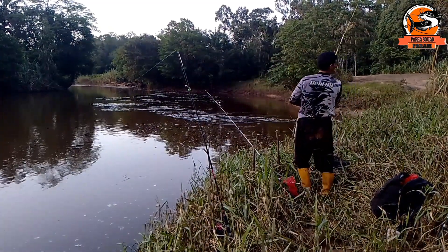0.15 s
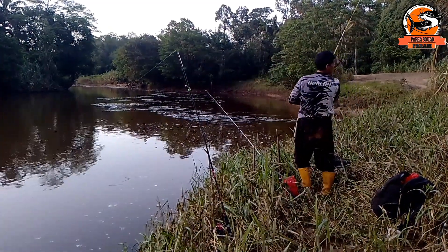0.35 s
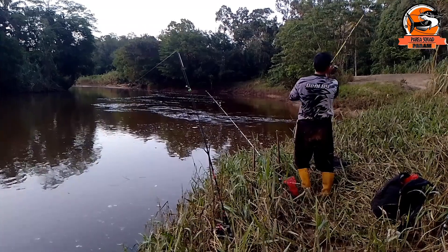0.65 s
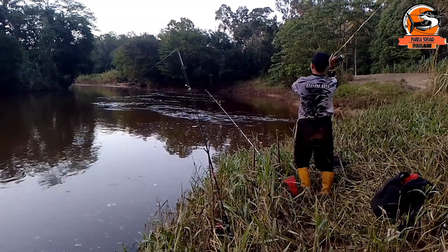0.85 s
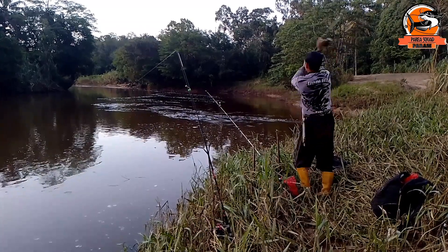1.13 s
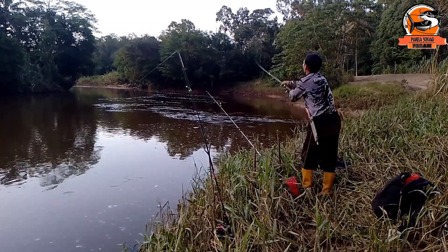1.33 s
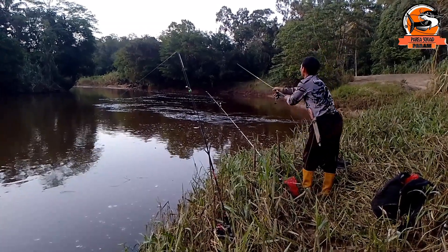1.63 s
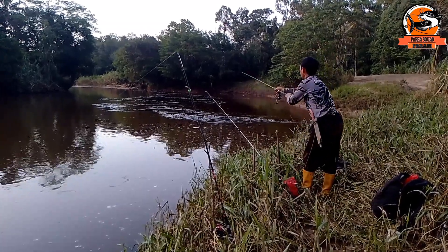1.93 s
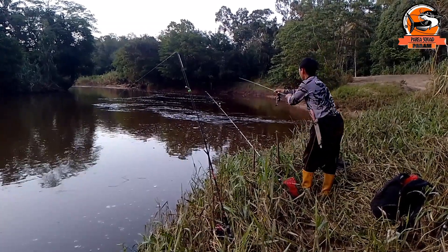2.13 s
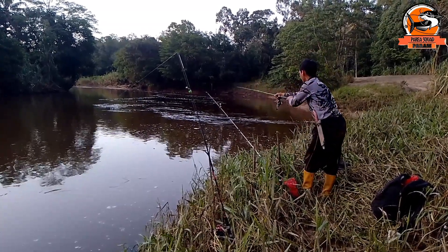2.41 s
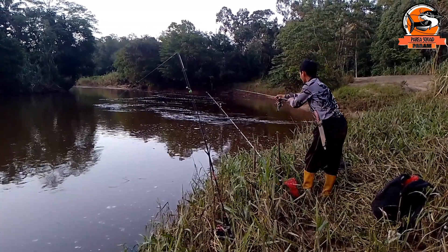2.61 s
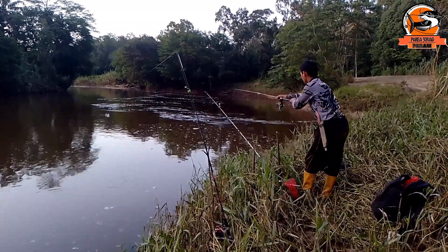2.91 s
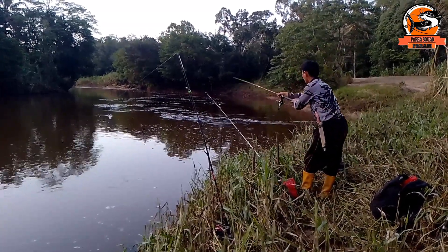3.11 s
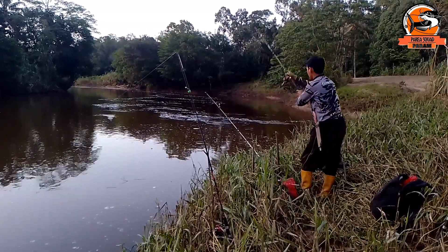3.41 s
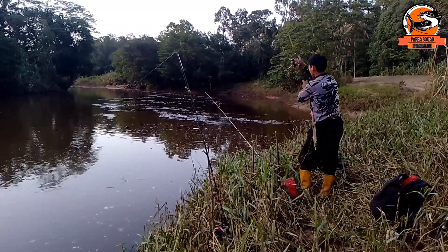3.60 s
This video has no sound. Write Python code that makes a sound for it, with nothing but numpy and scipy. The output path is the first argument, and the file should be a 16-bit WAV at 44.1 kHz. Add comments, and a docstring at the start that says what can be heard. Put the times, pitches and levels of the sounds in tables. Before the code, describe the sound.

Shrill insects chirr and rattle in rapid rasps over a hissing chorus beside a murmuring river

```python
"""First comes the hiss of a far insect chorus over a murmuring river, on a wooded bank in the evening.
With it go a trilling cricket, thin gliding whines and a lower throbbing drone, all made of wavering tones.
Close by, a shrill caller (a cicada or a small scolding bird) stutters in rasps and squeaks and holds one
long rattle: fast chirping pulses with puffs of noise, broken by clear tones that curve in pitch.
An angler's cast adds a swish of shaped noise and a few soft knocks; a stalk snaps and a boot thuds."""
import sys
import numpy as np
from scipy import signal
from scipy.fft import rfft, irfft
from scipy.io import wavfile
from scipy.ndimage import uniform_filter1d

SR = 44100
rng = np.random.default_rng(int(sys.argv[2]) if len(sys.argv) > 2 else 0)


def master(y):
    """Save y as 16-bit WAV."""
    cut = np.clip(np.atleast_2d(y).T, -1, 1)
    pcm = np.round(cut * 32767)  # scale
    wavfile.write(sys.argv[1], SR, pcm.astype(np.int16))


N = 165375
TIME = np.arange(N) / SR   # seconds


def from_db(db):
    """Turn decibels into a gain."""
    return 10 ** (np.asarray(db) / 20)


def rms_one(x):
    """Scale a sound to an average strength (rms) of 1."""
    return x / np.sqrt(np.mean(x ** 2) + 1e-20)


def level(rows):
    """Gain over time, drawn through (time [s], level [dB]) points."""
    return from_db(np.interp(TIME, *np.transpose(rows)))


def coloured(points, drive=1):
    """Noise, made louder and softer by drive, then given a spectrum with steep skirts; rms 1."""
    hz, db = np.transpose(points)
    f = np.maximum(np.arange(N // 2 + 1) * SR / N, 1)
    skirts = np.minimum(f / hz[0], 1) ** 6 * np.minimum(hz[-1] / f, 1) ** 6
    shape = from_db(np.interp(np.log(f), np.log(hz), db))
    noise = rng.standard_normal(N) * drive
    return rms_one(irfft(rfft(noise) * skirts * shape, N))


def drift(rate):
    """Smooth random wandering, up to about rate wiggles per second; rms 1."""
    f = np.arange(N // 2 + 1) * SR / N
    return rms_one(irfft(rfft(rng.standard_normal(N)) / (1 + (f / rate) ** 4), N))


def gate(start, length, attack, release):
    """Straight attack, hold and release; the two ramps are centred on the ends."""
    rise = (TIME - start) / attack
    fall = (start + length - TIME) / release
    return np.clip(np.minimum(rise, fall) + .5, 0, 1)


def phase_of(hz):
    """Running phase of a moving pitch."""
    return 2 * np.pi * np.cumsum(hz) / SR


# Spectrum of the river: (frequency [Hz], relative level [dB per Hz])
RIVER_COLOUR = [(15,-62),(25,-24),(70,-7.5),(120,-10),(164,-21.5),(276,-3),(490,-8.5),(1100,-6.5),(2080,-1.5),(3520,-120)]
RIVER_DB = -42.5


def river():
    """Running water heard as a steady, mostly low noise."""
    return from_db(RIVER_DB) * coloured(RIVER_COLOUR)


# Spectrum of the far insects together: (frequency [Hz], relative level [dB per Hz])
CHORUS_COLOUR = [(1300,-36.5),(1650,-6),(2000,-12),(2500,-11),(2900,-10),(3500,2),(4350,4),(5200,-5),(6100,-10),(6800,-11.5),(7600,-20.5),(9400,-22),(10200,-26),(15000,-49)]
# Slow swells of the far insects, before echoes: (time [s], level [dB])
CHORUS_LEVEL = [(0,-28.5),(.5,-27),(1.05,-28.5),(1.6,-27.5),(2.3,-25.5),(2.9,-28),(3.3,-26.5),(3.49,-30),(3.75,-28)]
CHORUS_FLUTTER_DB = 1.85


def chorus():
    """Many far insects blur into a fluttering hiss."""
    flutter = from_db(CHORUS_FLUTTER_DB * drift(32))
    return level(CHORUS_LEVEL) * coloured(CHORUS_COLOUR, flutter)


FAR_DRONE_HZ, FAR_DRONE_WIDTH_HZ, FAR_DRONE_DB = 2127, 126, -41
DRONE_WOBBLE_HZ = 16   # rms, for far and nearer drones


def far_drone():
    """Farther callers blend into a narrow band: a tone whose strength wanders at random."""
    pitch = FAR_DRONE_HZ + DRONE_WOBBLE_HZ * drift(42.4)
    return from_db(FAR_DRONE_DB) * rms_one(drift(FAR_DRONE_WIDTH_HZ / 2) * np.sin(phase_of(pitch)))


# Calls of the droning insects: (start [s], length [s], level [dB])
DRONES = [(-.1,0.62,-38),(1.176,0.091,-38.5),(1.495,.53,-34.5),(2.609,0.077,-35.5),(2.799,.62,-35.5)]
DRONE_HZ, DRONE_ARCH_HZ, DRONE_THROB_DB = 2165, 62, 2.4


def drones():
    """Throbbing insect tones that arch up and down in pitch."""
    wobble, out = DRONE_WOBBLE_HZ * drift(110), np.zeros(N)
    for start, length, db in DRONES:
        arch = np.sin(np.pi * np.clip((TIME - start) / length, 0, 1))
        tone = np.sin(phase_of(DRONE_HZ + DRONE_ARCH_HZ * arch + wobble))
        out += from_db(db) * gate(start, length, 0.015, 0.034) * tone
    return np.sqrt(2) * out * rms_one(from_db(DRONE_THROB_DB * drift(38)))


HIGH_WHINE_HZ, HIGH_WHINE_DB = 9060, -55.5
WHINE_WOBBLE_HZ = 26   # rms, for this and the gliding whines


def high_whine():
    """A very faint high tone whose strength wanders at random."""
    tone = np.sin(phase_of(HIGH_WHINE_HZ + WHINE_WOBBLE_HZ * drift(29.5)))
    return from_db(HIGH_WHINE_DB) * drift(50) * tone


# Thin whines: (start [s], length [s], level [dB], start pitch [Hz], end pitch [Hz])
WHINES = [(0,.13,-38,6180,5680),(.15,.19,-33,5660,5640),(.31,.05,-38,6380,6200),(.42,.24,-36,5990,6080),(.67,.05,-37,6050,5820),(.72,.4,-32.5,5680,5530),(1.03,.08,-38,6420,6150),(2.07,.24,-29.5,5280,5370),(3.02,.3,-35,5800,5700),(3.62,.2,-39.5,6010,5900)]
WHINE_PULSES_PER_S, WHINE_PULSE_DEPTH = 37, .45
WHINE_FADE_S, WHINE_FLUTTER_DB = .035, 1.8


def whines():
    """Thin insect tones that glide in pitch and pulse unevenly."""
    wobble, out = WHINE_WOBBLE_HZ * drift(120), np.zeros(N)
    for start, length, db, *hz in WHINES:
        pitch = np.interp(TIME, [start, start + length], hz) + wobble
        out += from_db(db) * gate(start, length, WHINE_FADE_S, WHINE_FADE_S) * np.sin(phase_of(pitch))
    pulse_rate = WHINE_PULSES_PER_S * np.exp(0.192 * drift(14.5))
    pulsing = 1 + WHINE_PULSE_DEPTH * np.sin(phase_of(pulse_rate))
    return np.sqrt(2) * out * rms_one(pulsing * from_db(WHINE_FLUTTER_DB * drift(45)))


# Trills of the cricket: (start [s], length [s], level [dB])
TRILLS = [(-.05,0.49,-40),(0.902,0.51,-40.5),(1.89,0.53,-42.5),(2.906,0.57,-44.5)]
CRICKET_HZ, CRICKET_PULSES_PER_S, CRICKET_FALL_HZ = 6415, 38, 266


def cricket():
    """A trill about once a second; every wing stroke is a swelling tone that sags in pitch."""
    stroke = TIME * CRICKET_PULSES_PER_S % 1   # 0 to 1 through each stroke
    pitch = CRICKET_HZ + CRICKET_FALL_HZ * (.5 - stroke) + 25 * drift(170)
    tone = rms_one(np.sin(np.pi * stroke) ** 2 * np.sin(phase_of(pitch)))
    return tone * sum(from_db(db) * gate(start, length, 0.037, 0.045) for start, length, db in TRILLS)


# Rise and fall of the cast's swish: (time [s], level [dB])
SWISH_LEVEL = [(1.3,-47),(1.41,-28),(1.52,-30),(1.65,-33),(1.85,-36.5),(2.3,-52)]
# Spectrum of the swish: (frequency [Hz], relative level [dB per Hz])
SWISH_COLOUR = [(200,-8),(550,0),(1100,-1.5),(2200,5.5),(5000,3.5),(9000,-11),(12000,-12.5),(15500,-13)]


def swish():
    """The angler's cast through the air: broad noise that rises fast and fades slowly."""
    return level(SWISH_LEVEL) * coloured(SWISH_COLOUR)


# Dull thuds of a shifting boot: (time [s], level before the attack ramp [dB], pitch [Hz])
THUDS = [(2.97,-32.5,620),(2.995,-35.5,310.5),(3.021,-31,252)]
THUD_ATTACK_S, THUD_DECAY_S = 0.0055, 0.025


def thuds():
    """Short low puffs of noise from trodden grass and soil."""
    out = np.zeros(N)
    for start, db, hz in THUDS:
        attack = np.clip((TIME - start) / THUD_ATTACK_S, 0, 1)
        decay = np.exp(-np.abs(TIME - start) / THUD_DECAY_S)
        puff = coloured([(hz * 0.87, -8), (hz, 0), (hz * 1.15, -9), (hz * 3.16, -15)])
        out += from_db(db) * attack * decay * puff
    return out


# Soft knocks of the tackle, before the bass is cut: (time [s], level [dB], pitch [Hz])
KNOCKS = [(1.295,-36,897),(1.31,-27.5,870),(1.409,-28,615.4),(1.486,-27.5,817),(1.512,-31,568),(1.601,-24,841),(1.618,-19.5,862)]
# Ways a knocked object rings: (pitch ratio, relative level [dB], time to fall 60 dB [s])
KNOCK_MODES = [(1,5,0.064),(1.19,-10,0.059),(2.02,-0.5,0.058)]
KNOCK_CRACK_DB, KNOCK_CRACK_S = -6.5, 0.011   # relative level and decay time


def knocks():
    """Each knock is a short noisy crack and three ringing tones that die away."""
    out, crack = np.zeros(N), coloured([(400, 1), (1500, 5), (3000, -19)])
    for start, db, hz in KNOCKS:
        age = np.maximum(TIME - start, 0)
        ring = np.zeros(N)
        for ratio, mode_db, t60 in KNOCK_MODES:
            fade = from_db(mode_db - 60 * np.minimum(age / t60, 2))
            ring += fade * np.sin(2 * np.pi * hz * ratio * age)
        crack_fade = (age > 0) * np.exp(-np.minimum(age / KNOCK_CRACK_S, 20))
        out += from_db(db) * (ring + from_db(KNOCK_CRACK_DB) * crack * crack_fade)
    return out


TWIG_S, TWIG_DB, TWIG_DECAY_S = .689, -23, .005   # level before the bass is cut


def twig():
    """A dry stalk snaps: noise that starts at once and dies within milliseconds."""
    fade = (TIME > TWIG_S) * np.exp(-np.abs(TIME - TWIG_S) / TWIG_DECAY_S)
    return from_db(TWIG_DB) * fade * coloured([(450, -3), (750, 10.0), (1300, -22), (2800, 4), (3500, -8)])


def low_cut(x, hz):
    """Small objects radiate little bass, so remove it."""
    return signal.sosfilt(signal.butter(2, hz, "high", fs=SR, output="sos"), x)


# Broad shape of the caller's voice: (frequency [Hz], level [dB])
VOICE = [(2300,-24),(2650,-20),(2900,-5.5),(3100,-9),(3280,-0.5),(3900,-5.5),(4600,-3),(4850,-6.5),(5150,-10),(5650,-2),(6000,-5),(6300,-34),(7200,-17),(9000,-6)]
# Narrow fixed ripples that ground and microphone lay over the rasp:
# (frequency [Hz], width [Hz], boost [dB])
RIPPLES = [(2920,70,4),(3338,90,5),(3630,80,4),(3890,70,4),(4228,70,4.5),(4440,60,3.5),(4590,60,3.5),(4930,60,3),(5265,55,4),(5945,60,4)]


def voiced_and_rippled(x):
    """Apply the caller's broad voice and the fixed ripples (minimum phase, so nothing rings early)."""
    f = np.maximum(np.arange(N // 2 + 1) * SR / N, 1)
    db = np.interp(f, *np.transpose(VOICE))
    for hz, width, boost in RIPPLES:
        db += boost / (1 + (2 * (f - hz) / width) ** 2)
    cepstrum = irfft(np.log(from_db(db)), N)
    cepstrum[1:] *= 2 * (np.arange(1, N) <= N // 2)   # fold onto the earlier half: minimum phase
    return irfft(rfft(x) * np.exp(rfft(cepstrum)), N)


def shrill(hz):
    """The close caller's pure tone; rms 1."""
    return np.sqrt(2) * np.sin(phase_of(hz))


# Clear squeaks, level before flutter and echoes:
# (start [s], length [s], level [dB], start pitch [Hz], middle pitch [Hz], end pitch [Hz])
SQUEAKS = [(.114,0.012,-15.5,4210,3840,3740),(.197,0.01,-21,3560,3300,3380),(0.296,0.0085,-14.5,3930,3860,3560),(.362,0.0074,-17,4000,3750,3600),(0.364,0.052,-22,3050,2990,2960),
           (.404,.018,-16.5,3550,4220,4200),(.544,0.02,-17.5,3560,3750,3970),(0.624,0.024,-22.5,4960,4480,4170),(.729,0.0063,-15,3630,3400,3400),(0.859,0.0056,-23,3620,3640,3810),
           (.991,0.01,-13,4470,3430,3330),(1.006,0.0088,-16,3700,3540,3270),(1.04,0.0068,-14,3800,3510,3480),(1.335,.012,-26,3400,3300,3280),(1.387,0.023,-16,4300,4190,4320),
           (1.664,0.048,-18.5,4560,4600,4171),(1.696,0.03,-12,4320,3760,3690),(1.724,0.021,-16,3603,3710,3620),(1.738,.011,-8,3790,3830,3930),(1.748,0.0085,-11,4130,4410,4400),(2.224,.012,-16,3740,3550,3360),(2.57,.038,-20,4955,3700,3390),(2.667,0.013,-18.5,3545,3736,3994),
           (2.986,0.038,-15,4430,3837,3360),(3.187,0.015,-13.5,3465,3530,3640),(3.202,0.01,-10,3680,3560,3650),(3.321,0.065,-32,3180,2908,3680),(3.526,.01,-22,4350,4430,4475),(3.551,.015,-19.5,4300,4600,5040),(3.618,0.005,-23.5,4140,3850,3400),(3.694,0.02,-21.5,4930,4950,4980)]
SQUEAK_WOBBLE_HZ, SQUEAK_FLUTTER_DB = 105, 1.4


def squeaks():
    """Moments when the rasp locks into one tone that swells, curves in pitch and fades."""
    out, wobble = np.zeros(N), SQUEAK_WOBBLE_HZ * drift(460)
    for start, length, db, *hz in SQUEAKS:
        on = (TIME >= start) & (TIME < start + length)
        along = (TIME[on] - start) / length   # 0 to 1 through the squeak
        swell = np.sqrt(2 * np.abs(np.sin(np.pi * along)))
        curve = np.polyval(np.polyfit([0, .5, 1], hz, 2), along)
        out[on] += from_db(db) * swell * shrill(curve + wobble[on])
    return out * from_db(SQUEAK_FLUTTER_DB * drift(140))


RASP_ATTACK_S, RASP_RELEASE_S = .0015, .003


def burst(start, length):
    """A quick attack, a hold and a dying tail."""
    attack = np.clip((TIME - start) / RASP_ATTACK_S + .5, 0, 1)
    return attack * np.exp(-np.clip((TIME - start - length) / RASP_RELEASE_S + .5, 0, 20))


# The caller's rasps, level before voice, ripples and echoes:
# (start [s], length [s], level [dB], pitch [Hz], sizzle relative to that level [dB])
RASPS = [(.095,0.031,-12.5,3890,-21),(0.166,0.052,-15.5,3700,-16.5),(.347,0.029,-14,3900,-19),(0.378,0.043,-19.5,3996,-12.5),(0.426,.02,-22.5,4310,-15),
         (0.532,0.034,-15.5,3920,-22),(0.578,.02,-16,3929,-19),(0.602,0.058,-16,4725,-23),(0.76,0.019,-17.5,3893,-23),(0.821,0.079,-13,4139,-24.5),
         (1.098,0.0049,-12,3792,-23),(1.153,0.025,-14,3938,-18),(1.183,0.048,-11.5,4381,-24),(1.23,.025,-18.5,4305,-25),(1.334,0.051,-17.5,3887,-20),
         (1.382,0.033,-13.5,4007,-23),(1.441,0.077,-14.5,3683,-20),(1.535,0.076,-16,4003,-20),(1.613,0.079,-13.5,4095,-25.5),
         (1.694,0.046,-27,4002,-10.5),(1.755,0.1456,-13,3994,-27.5),(1.907,0.058,-15,3895,-25),(1.968,0.11,-14.5,4718,-25),(2.085,0.11,-17,3917,-28),
         (2.2,0.053,-15,3656,-26),(2.283,0.082,-16.5,3943,-19),(2.361,0.061,-14,3850,-24),(2.422,.148,-15.5,3752,-19.5),(2.569,0.13,-15,3914,-21.5),
         (2.717,0.094,-13.5,4145,-28),(2.887,0.004,-16.5,3993,-56),(2.964,.048,-13.5,3950,-21),
         (3.18,.03,-23.5,4001,-10),(3.277,.025,-20,4205,-39),(3.323,0.068,-18.5,3597,-13.5),(3.412,0.0063,-14.5,4314,-34),(3.527,0.011,-23,4399,-15),
         (3.548,0.023,-17.5,4469,-20),(3.616,0.0078,-18,3690,-39),(3.697,0.019,-28,4307,-12)]
# How deeply the pulses throb in groups: (time [s], depth [share])
THROB = [(1.7,.15),(2.05,.3),(2.2,.75),(2.33,.35),(2.45,.65),(2.6,.15)]
# Spectrum of the puffs, before it slides with the pitch: (frequency [Hz], relative level [dB per Hz])
PUFF_COLOUR = [(2600,0.5),(3300,0.5),(4600,4.5),(5050,1),(5900,-10.5),(6600,-4),(7500,-46)]
# Spectrum of the sizzle, before voice and ripples: (frequency [Hz], relative level [dB per Hz])
SIZZLE_COLOUR = [(5450,-10),(5800,9.5),(6100,5.5),(6400,15),(7600,-0.5),(9300,-1.5),(10100,-9),(12600,-21),(15000,-26)]
PULSES_PER_S, PULSE_JITTER, PULSE_SPREAD_DB, PULSE_DEPTH = 232, .2, 1.4, .78
THROB_PULSES, THROB_FALL_HZ = 3, 358   # pulses per group; the pitch sags through each group
PULSE_FALL_HZ, RASP_WOBBLE_HZ, RASP_WANDER_HZ = 1147, 326.6, 110
RASP_TONE_DB, RASP_NOISE_DB, RASP_RAGGED_DB = -2, -4.5, .9
RASP_CEILING = 2.4   # soft limit on the swing, in multiples of roughly the rasp's rms


def rasps():
    """Uneven fast pulses, each a tiny falling chirp with a puff of noise, under a high sizzle."""
    gates = np.array([burst(start, length) for start, length, *_ in RASPS])
    _, _, db, hz, sizzle_db = np.transpose(RASPS)
    pitch = (hz @ gates + 1e-6 * hz.mean()) / (gates.sum(axis=0) + 1e-6)

    cycles = np.cumsum(PULSES_PER_S * np.exp(PULSE_JITTER * drift(120))) / SR
    number, within = cycles.astype(int), cycles % 1   # which pulse, and how far through it
    group = cycles / THROB_PULSES % 1
    depth = np.interp(TIME, *np.transpose(THROB))
    throb = (1 - depth * np.cos(2 * np.pi * group)) / np.sqrt(1 + depth ** 2 / 2)
    throb = throb * rms_one(from_db(RASP_RAGGED_DB * drift(40)))
    pitch = pitch + THROB_FALL_HZ * (.5 - group) + RASP_WANDER_HZ * drift(20)

    # every pulse has its own strength
    strength = from_db(PULSE_SPREAD_DB * np.clip(rng.standard_normal(N), -2, 2)[number])
    pulse_shape = 1 - PULSE_DEPTH * np.cos(2 * np.pi * within)
    pulses = rms_one(uniform_filter1d(strength, size=30) * pulse_shape)
    tone = pulses * shrill(pitch + PULSE_FALL_HZ * (.5 - within) + RASP_WOBBLE_HZ * drift(502.7))

    # the noise band slides with the pitch
    slide = np.exp(1j * phase_of(pitch - hz.mean()))
    puffs = np.real(signal.hilbert(coloured(PUFF_COLOUR, pulses)) * slide)
    rasp = from_db(RASP_TONE_DB) * tone + from_db(RASP_NOISE_DB) * puffs
    swing = np.abs(signal.hilbert(rasp))
    rasp = throb * rms_one(rasp / np.hypot(1, swing / RASP_CEILING))

    sizzle = rms_one(voiced_and_rippled(coloured(SIZZLE_COLOUR, throb)))
    return voiced_and_rippled((from_db(db) @ gates) * rasp) + (from_db(db + sizzle_db) @ gates) * sizzle


GROUND_ECHO_S, GROUND_ECHO = .00304, 0.24   # delay and gain
TREES_DB, TREES_T60_S = -15, 0.23   # scatter level and time to fall 60 dB


def outdoors(x):
    """One bounce off the ground and a faint scatter from the trees."""
    tail = rng.standard_normal(SR) * from_db(-60 * TIME[:SR] / TREES_T60_S)
    scatter = signal.fftconvolve(x, tail / np.linalg.norm(tail))[:N]
    bounce = np.interp(TIME - GROUND_ECHO_S, TIME, x, left=0)
    return x + GROUND_ECHO * bounce + from_db(TREES_DB) * scatter


def scene():
    """River and insects behind, then the angler, then the close caller."""
    background = river() + far_drone() + drones() + high_whine() + whines() + cricket()
    angler = swish() + thuds() + low_cut(knocks() + twig(), 640)
    echoing = outdoors(chorus() + squeaks() + rasps())
    return (background + angler + echoing)[None]


def record(dry):
    """Cut the very top: 70 dB down from 16300 Hz upward."""
    return signal.sosfilt(signal.cheby2(16, 70, 16300, fs=SR, output="sos"), dry)


dry = scene()
out = record(dry)
master(out)
```